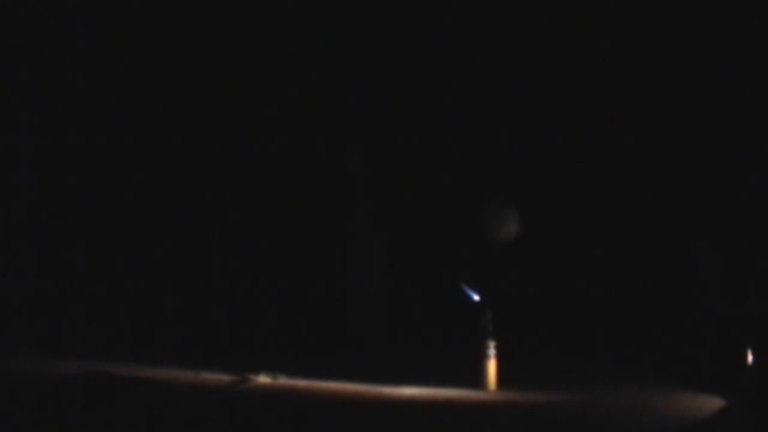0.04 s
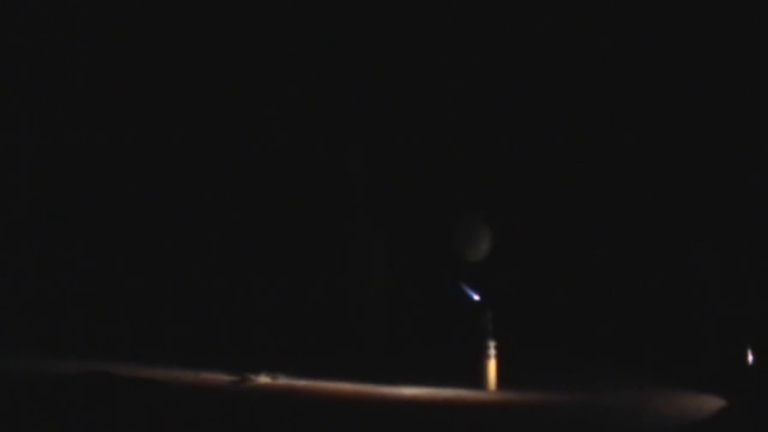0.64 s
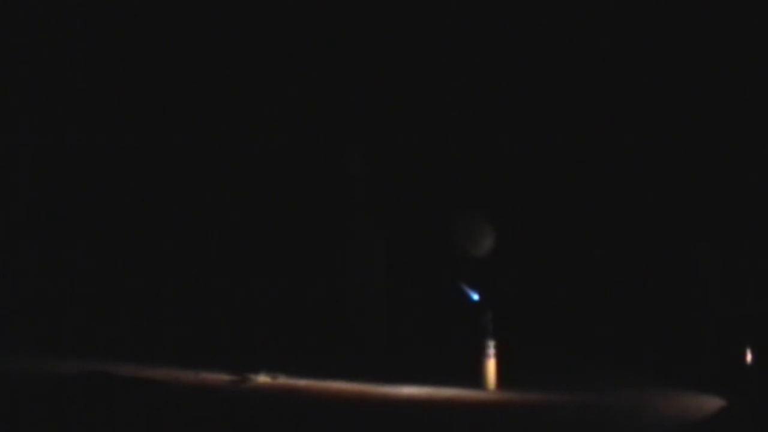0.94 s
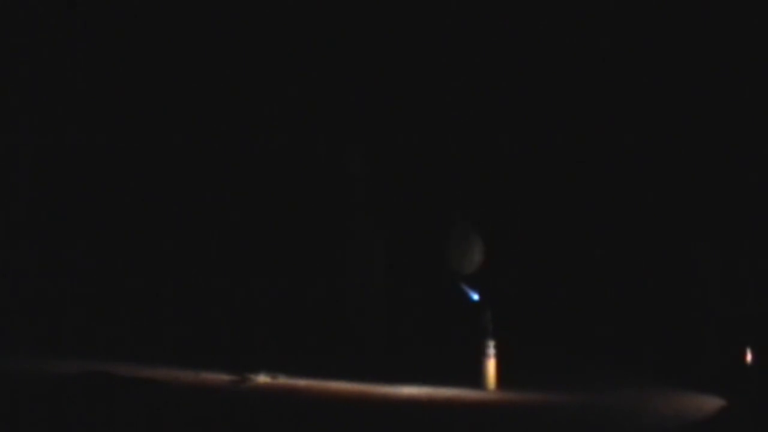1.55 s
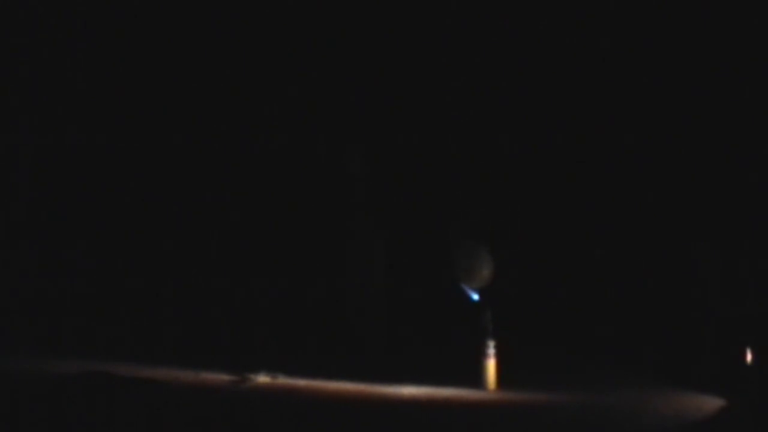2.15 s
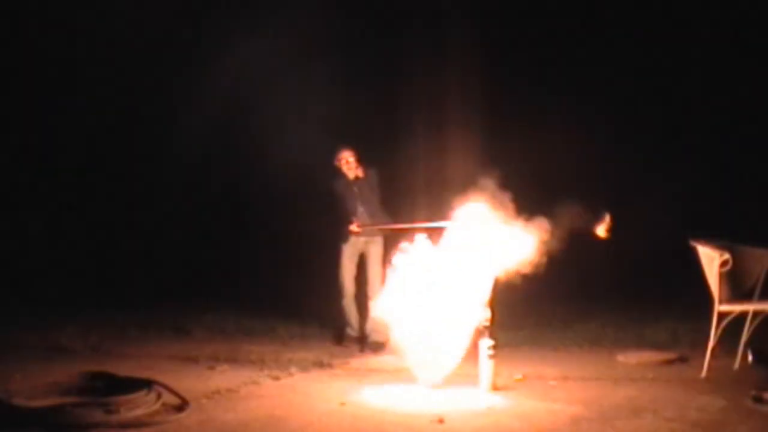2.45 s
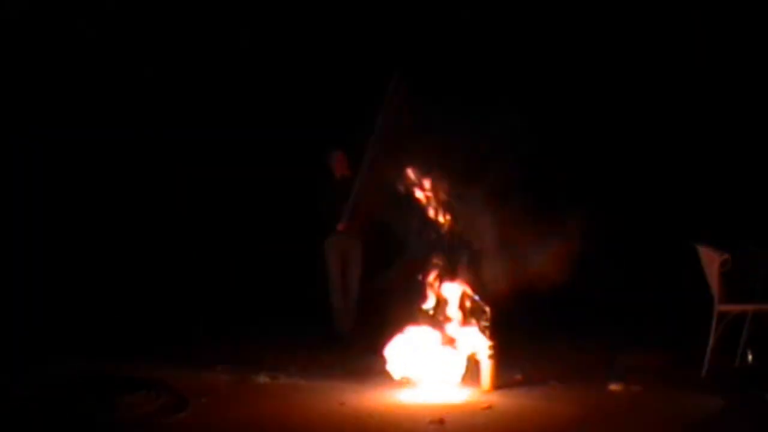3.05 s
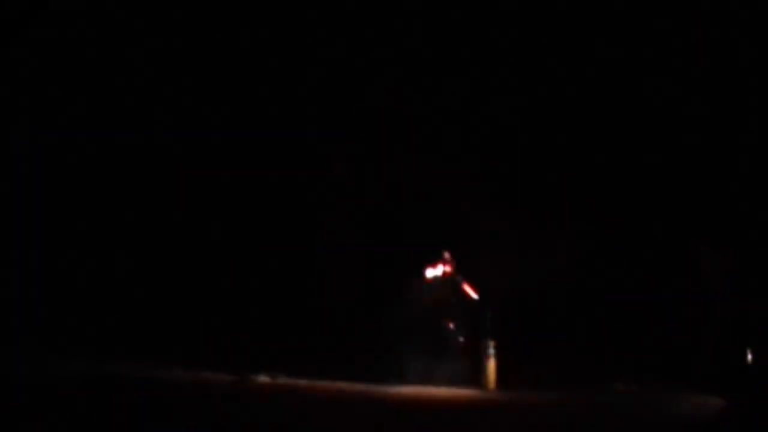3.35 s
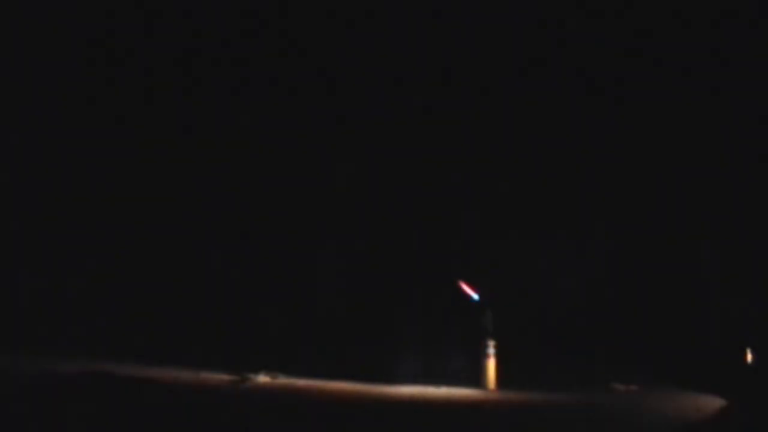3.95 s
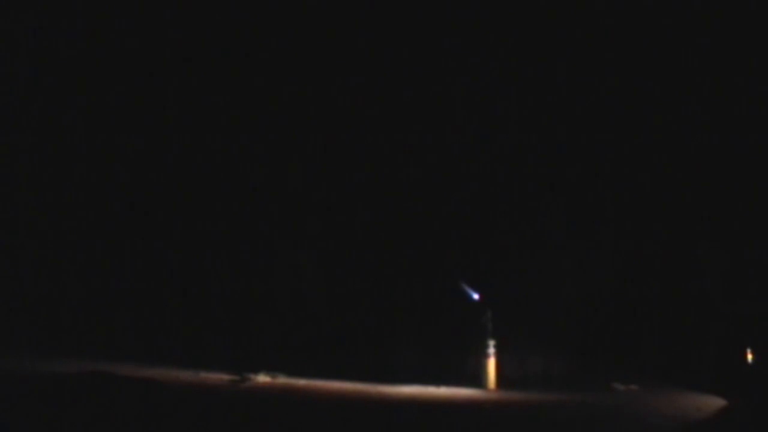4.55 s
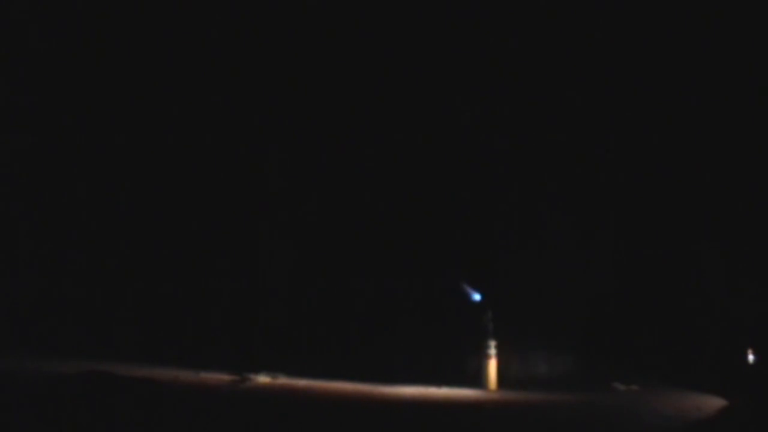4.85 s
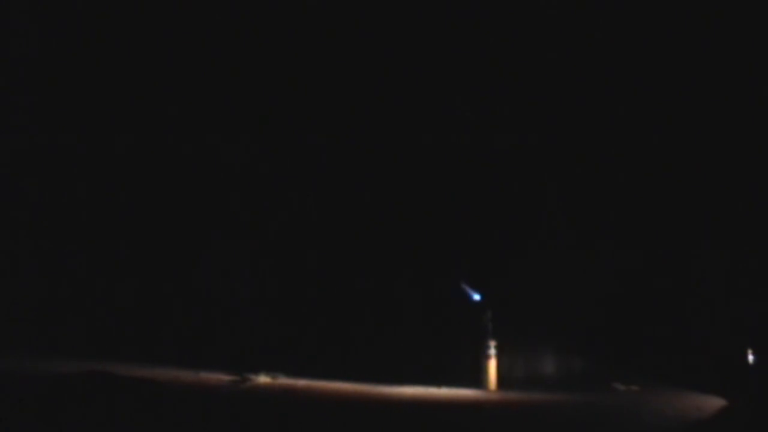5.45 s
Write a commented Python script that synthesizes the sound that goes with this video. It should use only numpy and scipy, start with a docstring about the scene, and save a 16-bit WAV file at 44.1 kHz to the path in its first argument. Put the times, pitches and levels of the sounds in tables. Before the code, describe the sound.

A blowtorch hisses steadily in an outdoor yard. A little before halfway, a powder-filled balloon bursts over it with a loud, sharp pop that overloads the microphone, followed by quick echoes and a short, dull boom. The powder burns with a faint low rush that soon fades. The hiss swirls and dips for a moment, then steadies and carries on to the end.

```python
"""Blowtorch and bursting powder balloon

A blowtorch hisses on the ground in a yard at night; its direct sound interferes with a ground reflection.
A balloon full of powder bursts over it: the bang echoes off things nearby and overloads the microphone.
The powder burns in a fireball whose hot air refracts and shades the hiss until it has risen away."""
import sys
import numpy as np
from scipy import signal
from scipy.fft import rfft, irfft
from scipy.io import wavfile
from scipy.ndimage import uniform_filter1d

SR = 44100
rng = np.random.default_rng(int(sys.argv[2]) if len(sys.argv) > 2 else 0)


def int16_out(signal):
    """Quantize to a 16-bit WAV file."""
    q = np.round(np.clip(np.atleast_2d(signal).T, -1, 1) * 32767)
    wavfile.write(sys.argv[1], SR, q.astype(np.int16))


N = 250929
TIME, FREQUENCY = np.arange(N) / SR, np.fft.rfftfreq(N, 1 / SR)
BURST_S = 2.38156


def gain_of(db):
    """Amplitude ratio of a level in decibels."""
    return 10 ** (np.asarray(db) / 20)


def unit_rms(x):
    """Normalisation to rms 1."""
    return x / np.sqrt(np.mean(x ** 2) + 1e-20)


def spectrum_at(points, hz):
    """Interpolation on a logarithmic frequency axis."""
    f, value = np.transpose(points)
    return np.interp(np.log(hz + 1), np.log(f + 1), value)


def add(mix, start_s, sound):
    """Superposition of a stereo sound on the mix."""
    part = mix[:, round(start_s * SR):][:, :sound.shape[1]]
    part += sound[:, :part.shape[1]]


def trapezoid(t, start, attack_s, hold_s, release_s):
    """A linear envelope from 0 to 1 and back."""
    age = t - start
    return np.clip(np.minimum(age / attack_s, 1 - (age - attack_s - hold_s) / release_s), 0, 1)


def band(hz, low_hz, high_hz, steepness=4.1):
    """Band-pass weights with soft edges, as a column."""
    return (1 / (1 + (low_hz / (hz + 1)) ** steepness) / (1 + (hz / high_hz) ** steepness))[:, None]


def fluctuation(corner_hz):
    """Low-pass random modulation of rms 1."""
    return unit_rms(irfft(rfft(rng.standard_normal(N)) / (1 + (FREQUENCY / corner_hz) ** 2), N))


# likeness of the two channels (frequency [Hz], coherence [0-1])
COHERENCE = [(60, 0.82), (130, 0.92), (350, 0.99), (800, 0.91), (1200, 0.97), (1900, 1), (2400, 0.87),
             (3600, 0.95), (4800, 0.77), (5700, 1), (11500, 1), (13000, 0.68)]

def noise(colour, peaks=(), size=N):
    """Partially coherent noise at two closely spaced microphones, coloured and scaled to rms 1."""
    hz = np.fft.rfftfreq(size, 1 / SR)
    peaks_db = sum(rise / (1 + (2 * (hz - f) / width) ** 2) for f, width, rise in peaks)
    db = spectrum_at(colour, hz) + peaks_db
    shared, apart = rfft(rng.standard_normal((2, size)))
    coherence = spectrum_at(COHERENCE, hz)
    mid, side = shared * np.sqrt(1 + coherence), apart * np.sqrt(1 - coherence)
    return unit_rms(irfft(np.array([mid + side, mid - side]) * gain_of(db), size))


# spectrum of the jet (frequency [Hz], relative level [dB])
JET_SPECTRUM = [(25, -45), (60, -22.5), (120, -10), (200, -11.5), (350, -5), (900, -3), (1450, 0.5),
                (2000, -1.1), (2900, -9.5), (5400, -7.5), (7700, -12.5), (9000, -19.5), (11700, -18.5),
                (14500, -27)]
# narrow peaks and dips that colour the torch's hiss (frequency [Hz], width [Hz], gain [dB])
HISS_COLOUR = [(318, 97, 0.9), (498, 43, -5), (540, 34, 1.5), (793, 160, 4), (1070, 24, -2),
               (1150, 26, 1.5), (1340, 31, 1), (1805, 26, 2), (2600, 27, 5.5), (3045, 320, 3.5),
               (3520, 140, 3), (4800, 300, 3), (5150, 89, 3.5), (5440, 290, -2), (6290, 500, 1.5),
               (7000, 230, -5), (8140, 81, -11), (10100, 420, 2), (13900, 800, 1.5)]
# spits of the flame (time [s], level [dB])
FLAME_SPITS = [(5.274, -26), (5.2765, -26)]

def torch(level_db=-37.5, flutter_db=0.74, flutter_hz=220, drift_db=0.14, drift_hz=2.05):
    """A turbulent jet hisses, and the flame spits briefly."""
    jet = noise(JET_SPECTRUM, HISS_COLOUR)
    jet -= 0.025 * (jet ** 2 - 1)  # nonlinear steepening makes the waves lopsided
    jet *= gain_of(level_db + flutter_db * fluctuation(flutter_hz) - drift_db * fluctuation(drift_hz))
    t = TIME[:512]
    for start, db in FLAME_SPITS:
        spit = noise([(1000, -15), (3500, 0), (7500, 0.5), (10000, -18)], size=len(t))
        add(jet, start, gain_of(db) * np.exp(-t / 0.00025) * spit)
    return jet


def eddies(shape, size=(7, 17)):
    """Turbulence as smooth random patches of rms 1 over frequency and time."""
    field = rng.standard_normal(shape)
    for axis, width in 2 * list(enumerate(size)):
        field = uniform_filter1d(field, width, axis)
    return unit_rms(field)


# hot plumes crossing the path
# (start [s], closing [s], hold [s], clearing [s], gain [dB], lower edge [Hz], upper edge [Hz])
HOT_PLUMES = [(2.556, .16, 0.061, 0.049, -6.5, 1780, 6000), (2.994, 0.053, 0.076, .055, -10.5, 1200, 8600),
              (3.196, 0.032, 0.091, 0.061, -7.5, 2500, 11000), (3.359, 0.042, .09, .42, -8, 920, 16000),
              (3.84, 0.036, .05, .03, -5, 8500, 16000), (4.06, .03, .01, .03, -3, 8500, 16000)]
# pockets of air acting as lenses (time [s], half length [s], gain [dB], lower edge [Hz], upper edge [Hz])
AIR_LENSES = [(2.52, 0.068, 5, 2830, 11000), (2.82, 0.027, 3, 3300, 11000), (2.917, 0.05, 4.5, 1200, 3000),
              (2.996, 0.032, 7.5, 6200, 18000), (3.195, 0.022, 1.5, 3000, 16000),
              (3.372, 0.022, 3.5, 2020, 9000), (4.02, 0.057, 8, 8800, 18000), (4.043, .07, 2, 1200, 8000),
              (4.16, .03, 2, 9000, 18000)]

def hot_air(hz, t, churn, swirl_db=3.0):
    """Refraction as a gain in dB: plumes shade, lenses focus, eddies make patches swell and fade."""
    shade = sum(db * band(hz, low, high) * trapezoid(t, start, closing, hold, clearing)
                for start, closing, hold, clearing, db, low, high in HOT_PLUMES)
    focus = sum(db * band(hz, low, high) * np.exp(-((t - centre) / half) ** 2)
                for centre, half, db, low, high in AIR_LENSES)
    lingering = churn ** 0.51  # small eddies die away late
    return shade + focus + swirl_db * lingering * band(hz, 2000, 14000) * eddies(shade.shape)


# lag of the ground reflection, shifted by warm air (time [s], delay [ms])
GROUND_DELAY = [(2.38, .517), (3.18, .52), (3.28, 0.48), (3.47, .46), (3.59, 0.54), (3.72, .61),
                (3.96, 0.546), (4.17, 0.52), (4.45, 0.52)]

def ground_comb(hz, t, churn, reflection=0.7, calm_hz=13800, churned_hz=3080):
    """Interference with the ground reflection forms a comb; churning air blurs its upper teeth."""
    coherent_hz = calm_hz * (churned_hz / calm_hz) ** churn
    bounce = reflection * np.exp(-(hz[:, None] / coherent_hz) ** 2)
    delay_s = np.interp(t, *np.transpose(GROUND_DELAY)) / 1000
    comb = 1 + bounce * np.exp(-2j * np.pi * hz[:, None] * delay_s)
    # what the bounce loses is scattered, so power is conserved
    return comb * np.sqrt((1 + reflection ** 2) / (1 + bounce ** 2))


# balance of the hiss (frequency [Hz], left minus right [dB])
HISS_BALANCE = [(60, 0.0), (200, 0.5), (380, 0), (700, -1.5), (1290, -0.5), (2380, -0.6), (4400, -2),
                (8120, -0.2), (15000, 1.5)]

def air_path(hiss):
    """Propagation over the ground, through air that churns while the powder burns and then settles."""
    frames = dict(fs=SR, nperseg=512, noverlap=384)
    hz, t, spectra = signal.stft(hiss, **frames)
    churn = trapezoid(t, BURST_S, attack_s=0.25, hold_s=0.85, release_s=0.58)
    sides = gain_of(np.outer([.5, -.5], spectrum_at(HISS_BALANCE, hz)))[:, :, None]
    spectra *= ground_comb(hz, t, churn) * gain_of(hot_air(hz, t, churn)) * sides
    return signal.istft(spectra, **frames)[1][:, :N]


def wall_echo(hiss, reflection=0.15, delay_s=0.00885, corner_hz=2200):
    """A dull reflection off a nearby surface bypasses the fire and ripples the low end by interference."""
    lag = np.exp(-2j * np.pi * FREQUENCY * delay_s)
    return irfft(rfft(hiss) * reflection * lag / np.hypot(1, FREQUENCY / corner_hz), N)


# spectrum of the burning powder (frequency [Hz], relative level [dB])
FIRE_SPECTRUM = [(30, -25), (70, -10), (200, 1), (400, -7), (900, -18), (3000, -35), (15000, -55)]

def fireball(level_db=-47, rise_s=0.07, fade_after_s=0.16, fade_db_per_s=29):
    """Combustion noise: a soft, low rush that fades as the powder is used up."""
    age = TIME - BURST_S
    db = level_db - fade_db_per_s * np.maximum(age - fade_after_s, 0)
    return np.clip(age / rise_s, 0, 1) * gain_of(db) * noise(FIRE_SPECTRUM)


# spectrum of the yard's diffuse field (frequency [Hz], relative level [dB])
YARD_SPECTRUM = [(40, -30), (100, -6), (190, 2.5), (380, -1.5), (700, -8), (1200, -24), (4000, -25),
                 (15000, -51)]

def yard_reverberation(level_db=-26, t60_s=0.53, build_s=0.0056):
    """Scattering round the yard turns the bang into a dull boom that decays exponentially."""
    age = np.maximum(TIME - BURST_S, 0)
    decay = np.exp(-np.log(1000) * age / t60_s)
    return gain_of(level_db) * (1 - np.exp(-age / build_s)) * decay * noise(YARD_SPECTRUM)


def swing(low_hz, high_hz, t, push_s=0.0001):
    """Damped oscillation within a band after a sudden push of air; peak 1."""
    push = t / push_s * np.exp(-t / push_s)
    wave = signal.sosfilt(signal.butter(2, [low_hz, high_hz], "band", fs=SR, output="sos"), push)
    return wave / abs(wave).max()


# spectrum of the tearing rubber (frequency [Hz], relative level [dB])
RUBBER_SPECTRUM = [(200, -7.5), (600, -2), (900, 6.5), (1700, 4.5), (2600, -5), (4300, -7), (5800, -4.5),
                   (9000, -10.5), (15000, -14.5)]
# reflections from things nearby (arrival time [s], signed amplitude [ratio], brightness [0-1])
BANG_ECHOES = [(2.391, 0.14, 0.9), (2.391, -0.26, 1), (2.405, 0.17, 0.35), (2.409, -0.18, 0.05),
               (2.428, -0.28, 0.3), (2.4353, 0.053, .1), (2.4440, -.08, .1), (2.4500, 0.086, 0.65),
               (2.478, -0.02, 0)]

def balloon_burst(thump_db=8.5, punch_db=-14, crack_db=-1.3, echo_crack_db=-10, lean_db=1.0):
    """Sudden expansion: the freed gas oscillates as a thump while the rubber cracks; echoes follow."""
    t = TIME[:4096]
    thump = gain_of(thump_db) * swing(209, 433, t) + gain_of(punch_db) * swing(52, 200, t)
    rise_s, fall_s = 0.0018, 0.0046
    tear = np.minimum(t / rise_s, np.exp((rise_s - t) / fall_s))
    bang = np.zeros((2, N))
    add(bang, BURST_S, thump + gain_of(crack_db) * tear * noise(RUBBER_SPECTRUM, size=len(t)))
    for arrival, amplitude, brightness in BANG_ECHOES:
        crack = brightness * gain_of(echo_crack_db) * tear * noise(RUBBER_SPECTRUM, size=len(t))
        add(bang, arrival, amplitude * (swing(233, 440 + 200 * brightness, t) + crack))
    return bang * gain_of(lean_db * np.array([[-1], [1]]))  # louder on the right


def scene():
    """Superposition of the hiss on its paths, the bang, its reverberation and the fire."""
    hiss = torch()
    return air_path(hiss) + wall_echo(hiss) + balloon_burst() + yard_reverberation() + fireball()


def record(dry, ceiling_db=-3.0, tilt_db=1.08, give=0.024, bass_cut_hz=42, treble_cut_hz=15860):
    """Saturation: the microphone clips on the bang, the left side sooner; band limiting follows."""
    ceiling = gain_of(ceiling_db + tilt_db * np.array([[-1], [1]]))
    x = (1 - give) * np.clip(dry, -ceiling, ceiling) + give * dry
    x = signal.sosfilt(signal.butter(2, bass_cut_hz, "high", fs=SR, output="sos"), x)
    low_pass = signal.firwin(511, treble_cut_hz, window=("kaiser", 9), fs=SR)
    return signal.oaconvolve(x, low_pass[None], "same")


dry = scene()
out = record(dry)
int16_out(out)
```